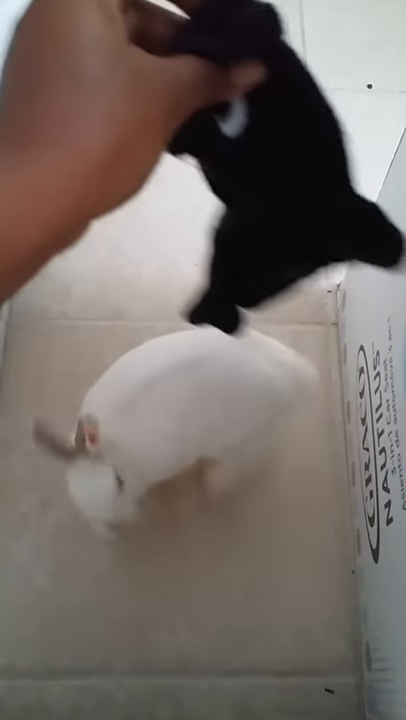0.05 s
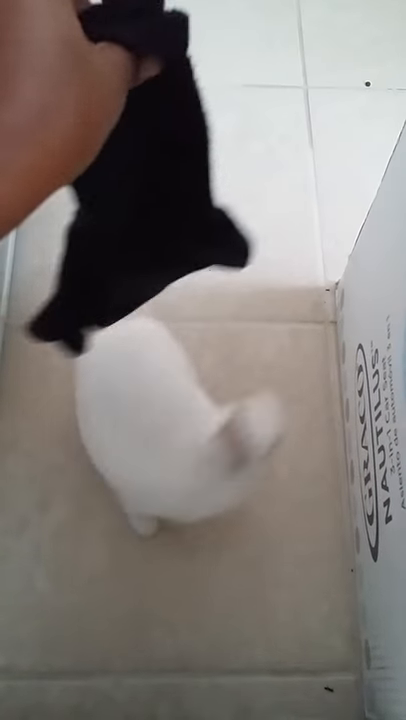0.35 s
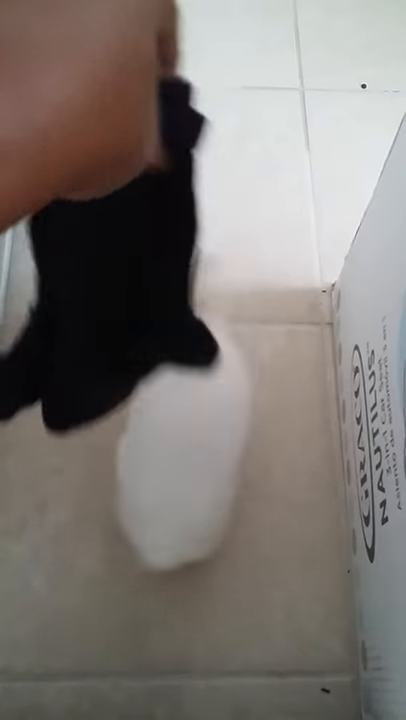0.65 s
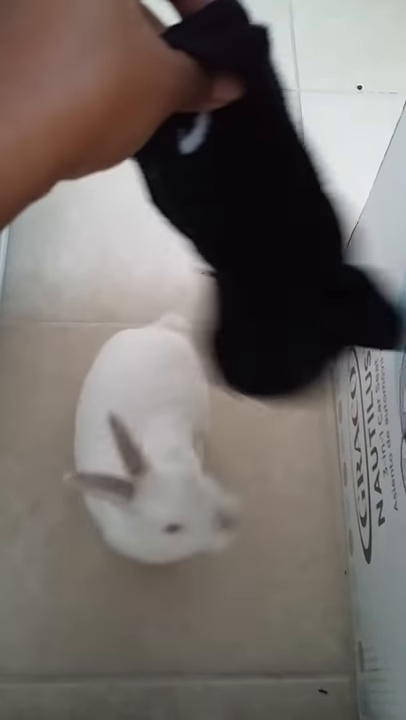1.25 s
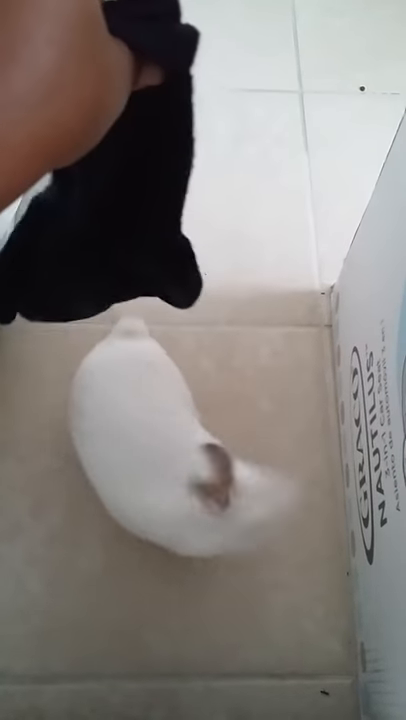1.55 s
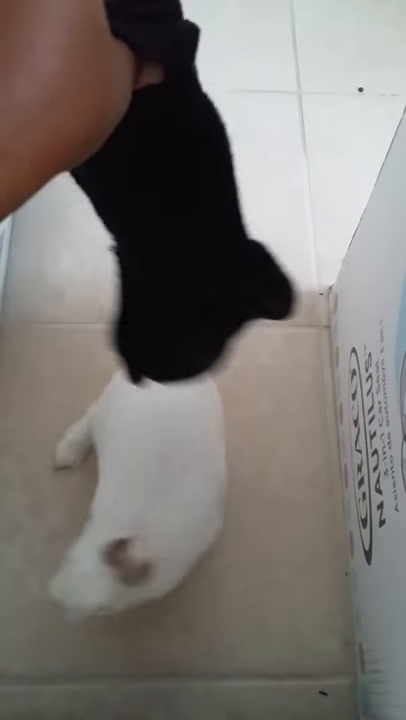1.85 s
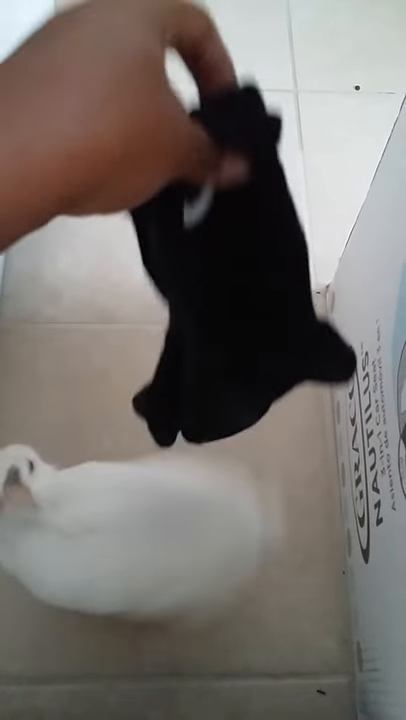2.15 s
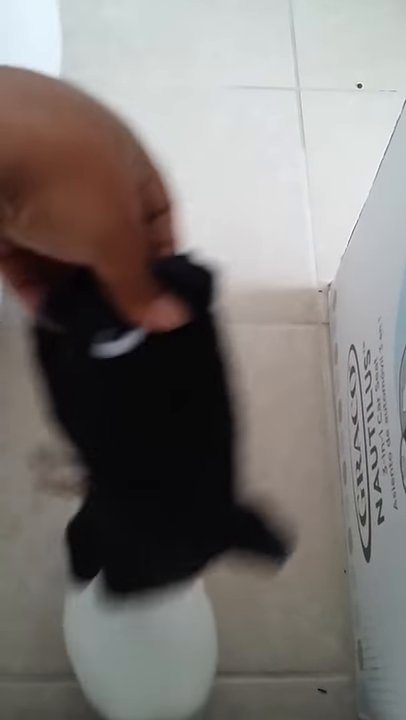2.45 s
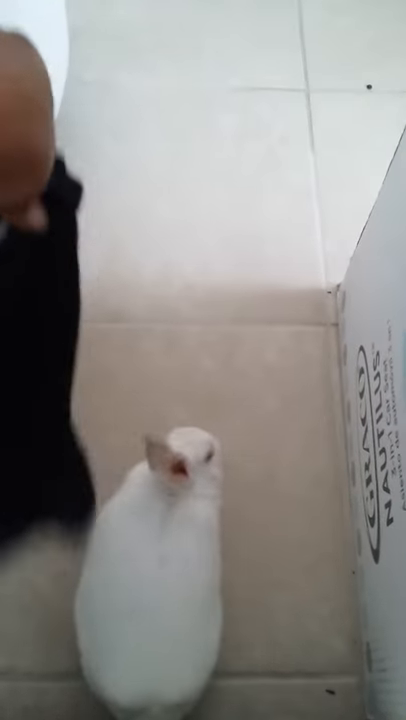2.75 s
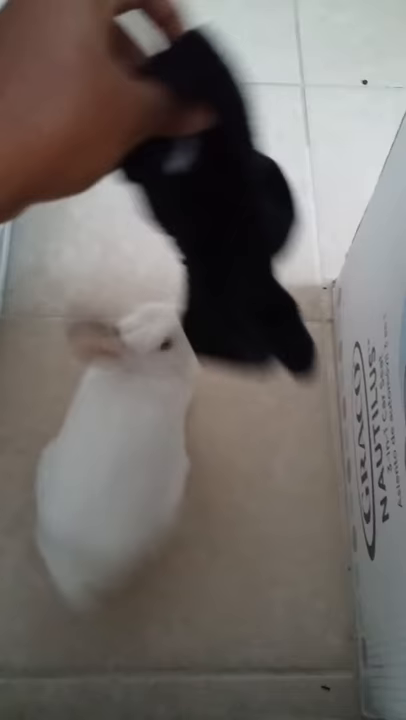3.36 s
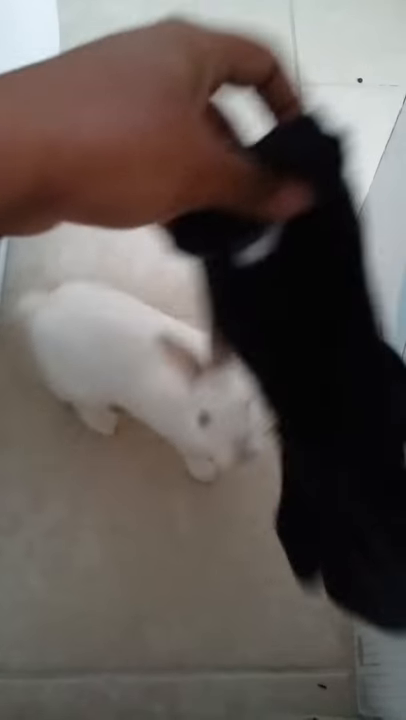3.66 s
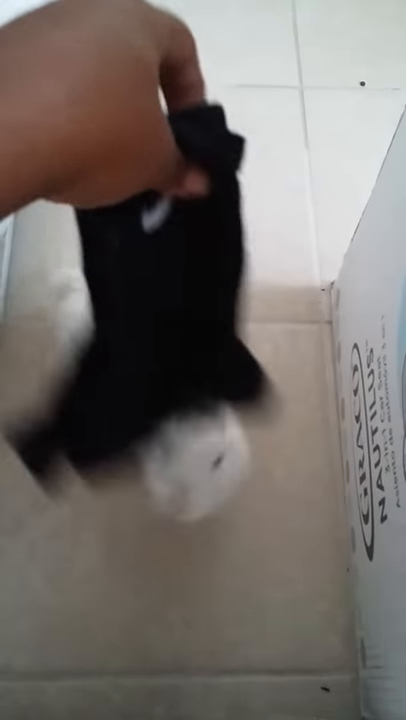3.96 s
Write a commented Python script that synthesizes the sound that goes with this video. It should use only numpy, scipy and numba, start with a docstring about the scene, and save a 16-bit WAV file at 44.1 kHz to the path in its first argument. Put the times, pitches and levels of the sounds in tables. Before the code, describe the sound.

Close to the microphone in a small, softly rumbling tiled room, a rabbit darts around with claw ticks, soft thuds and thin squeaks. Faint cloth swishes pass, and the scuffling grows busier and louder with brief raspy grunts.

```python
"""First the low rumble of a small tiled room, then the swish of a dangling cloth and the tick of claws.
A young rabbit, teased with the cloth, darts about beside a cardboard box, close to a stereo microphone.
Its paws knock, thud and scuff on the floor; the box throws the scuffs and swishes back.
Short nasal squeaks, a thin harmonic voice, break into rasping grunts when it lunges: flutter and
puffs of air ringing its throat and nose. The tiles add a short echo."""
import sys
import numpy as np
from scipy import signal
from scipy.fft import rfft, irfft
from scipy.io import wavfile
from scipy.ndimage import uniform_filter1d, map_coordinates
from numba import njit

SR = 44100
rng = np.random.default_rng(int(sys.argv[2]) if len(sys.argv) > 2 else 0)


def to_wav(s):
    """Save 16-bit WAV."""
    ch = np.atleast_2d(s).T  # columns
    pcm = np.round(np.clip(ch, -1, 1) * 32767)  # PCM
    wavfile.write(sys.argv[1], SR, pcm.astype(np.int16))


N = 176400

# spectrum of the room tone: f/Hz, relative level/dB
ROOM_COLOUR = [(20, -42), (30, -12), (45, -17.5), (61, -2), (78, -7.5), (100, -6.5), (130, 0.5),
               (160, -2.5), (195, -11.5), (260, -8), (400, -16.5), (600, -20.5), (1300, -35.5), (2400, -36),
               (3600, -43), (8000, -46), (14500, -54)]
# its balance between the microphones: f/Hz, left-right/dB
ROOM_TONE_BALANCE = [(60, -5.5), (220, -2), (700, -6), (1300, -1), (8000, 0.5)]
# its stereo width: f/Hz, side-mid/dB
ROOM_WIDTH = [(60, -32), (130, -17), (290, -15), (640, -3), (1300, 4), (3000, -1), (14000, 1)]
ROOM_DB, DRONE_DB, DRONE_HZ = -37.5, -41.5, 129.4

# swings of the cloth: t/s, length/s, level/dB
CLOTH_SWISHES = [(0.226, 0.25, -60.5), (0.945, 0.23, -60), (1.289, 0.078, -53.5), (1.509, 0.047, -50.5),
                 (1.673, 0.17, -57), (1.994, 0.13, -55), (2.128, 0.11, -55), (3.073, 0.22, -58.5),
                 (3.483, 0.18, -56.5)]
# spectrum of rubbing cloth: f/Hz, relative level/dB
SWISH_COLOUR = [(500, -5), (1500, -19), (3500, -4), (5500, -2.5), (8000, 4.5), (10000, 1), (14500, -13)]

# claws striking the tiles: t/s, level/dB, extra top treble/dB
CLAW_TICKS = [(0.242, -50, 12), (0.523, -54.5, 12), (0.67, -48.5, 12), (0.6778, -42.5, 3.5), (.790, -45, 1),
              (0.852, -43.5, 9), (0.9616, -46, 9), (1.1393, -38.5, 6.5), (1.473, -40, 0), (1.484, -46.5, 5),
              (1.746, -43.5, -8), (2.047, -37, -4), (2.075, -44, -7), (2.293, -48, 2), (2.3177, -45.5, 2),
              (2.576, -35, -11), (2.6832, -47.5, 4), (3.2516, -33.5, 2), (3.2805, -40, 6),
              (3.3034, -35.5, -3), (3.329, -36, 14), (3.3956, -35.5, 2), (3.458, -37.5, 8),
              (3.5708, -36, -3), (3.6636, -38, 1), (3.689, -38.5, 2), (3.698, -31.5, -1)]
# spectrum of a claw tick: f/Hz, relative level/dB
CLAW_COLOUR = [(300, -28), (1500, -3.5), (5000, 3.5), (8000, 13), (11000, 4.5), (14500, 3.5)]
TICK_DECAY_S, TICK_TAIL_S, TICK_TAIL_DB, TICK_RING_DB = 0.0035, 0.013, -12, 4.5
# balance of cloth, claws and scuffs between the microphones: f/Hz, left-right/dB
SCUFFLE_BALANCE = [(2200, -2), (4800, 11.5), (8000, 6.5), (13000, 0)]

# paws slapping the tiles: t/s, level/dB, left-right/dB
PAW_KNOCKS = [(0.532, -39.5, -13), (.886, -37.5, 6), (1.464, -38, 6), (1.48, -30, 5), (2.561, -36, 9)]
# resonances of a knock: f/Hz, nominal width/Hz, relative level/dB
KNOCK_RESONANCES = [(500, 176, 7), (880, 320, 3), (1510, 300, -10.5), (2670, 550, -9.5),
                    (5460, 3200, -14.5)]
KNOCK_ATTACK_S, KNOCK_DECAY_S = 0.0016, 0.0067

# clear squeaks: t/s, length/s, attack/s, start f/Hz, middle f/Hz, end f/Hz, level/dB,
# 2nd and 3rd harmonic at mid-squeak/dB, roughness/0-1, left-right/dB
RABBIT_SQUEAKS = [(0.564, 0.031, .008, 797, 829, 810, -47, -6.5, -17, 0.07, 8),
                  (0.881, 0.033, 0.0033, 804, 734, 760, -48.5, -10.5, -18, 0.47, 10),
                  (1.062, 0.035, .005, 773, 817, 825, -45.5, -18, -13, 0.39, 8),
                  (1.552, 0.032, .003, 860, 894, 800, -37, -13.5, -27, 0.04, 4),
                  (1.723, 0.044, 0.0086, 810, 811, 764, -44.5, -6.5, -16, 0.1, 1),
                  (1.757, 0.045, .006, 810, 850, 815, -45, -8, -3.5, 0.04, 2),
                  (2.013, 0.05, .008, 896, 844, 840, -48.5, -8, -8, 0.29, 1),
                  (2.640, 0.06, 0.03, 917, 913, 924, -36, -13, -13.5, 0.09, 4),
                  (2.912, 0.034, 0.0063, 843, 820, 774, -39, -21, -26, .1, 0),
                  (3.319, 0.036, 0.0068, 797, 839, 860, -38, -2.5, -12, 0, 6),
                  (3.352, 0.057, 0.0077, 1009, 999, 800, -41.5, -9, -19, 0.58, 10.5),
                  (3.442, 0.056, 0.0073, 907, 929, 860, -42, -26, -7.5, 0.87, 13),
                  (3.632, 0.021, 0.0034, 840, 834, 790, -35.5, -7.5, -27, 0.42, 9),
                  (3.644, 0.047, .004, 774, 810, 840, -38.5, -8.5, -21, 0.4, 7.5),
                  (3.725, 0.019, 0.0056, 820, 854, 850, -39, -5, -18, 0.3, 9)]
SQUEAK_RELEASE_S, OVERTONE_FADE_DB, UPPER_DB, UPPER_STEP_DB = .012, 9, -37, 1.2
WOBBLE, SHIMMER_DB, CYCLE_JITTER_RAD, OVERTONE_RASP = 0.1, 2, .07, .25
# nasal colour of squeaks and grunts: f/Hz, gain/dB
NASAL_COLOUR = [(2600, 0.5), (3700, -1.5), (4800, 8.5), (5500, 2), (6200, 4), (7100, -2), (8500, -2.5),
                (10000, -3)]

# feet landing: t/s, level/dB, f/Hz
FOOT_THUDS = [(0.799, -22.5, 133), (1.499, -34, 126), (1.764, -30, 140), (1.986, -30, 141.6),
              (3.695, -34, 133), (3.952, -25.5, 126)]
THUD_ATTACK_S, THUD_DECAY_S = 0.0055, 0.033

# paws sliding on the tiles: t/s, length/s, attack/s, release/s, level/dB, extra top treble/dB
PAW_SCUFFS = [(1.14, 0.067, .008, 0.026, -61, 12), (2.578, 0.055, 0.021, 0.032, -38, 3.5),
              (3.307, 0.068, 0.03, 0.029, -35.5, 6.5), (3.415, 0.093, 0.033, 0.028, -42.5, 0.5),
              (3.580, 0.031, 0.015, 0.015, -38.5, -5), (3.610, 0.022, 0.0033, 0.033, -33.5, 4)]
# spectrum of a sliding paw: f/Hz, relative level/dB
PAW_COLOUR = [(500, 5), (2500, -11), (3600, -6.5), (4600, -0.5), (6200, -1.5), (7700, 3), (9500, -2),
              (11500, -11.5), (14500, -14)]

# rasping grunts: t/s, length/s, attack/s, release/s, level/dB, resonance factor at start and at end,
# low resonances/dB, high resonances/dB, left-right/dB
RABBIT_GRUNTS = [(1.735, 0.021, .007, .008, -42.5, 0.91, 0.82, 9, -2, 8),
                 (2.038, 0.051, 0.007, 0.007, -42.5, 1.19, 1.09, 10, 4.5, 1),
                 (2.57, 0.069, 0.058, 0.019, -33, 0.87, 1.03, 4, 0.5, 1.5),
                 (3.084, 0.086, 0.019, 0.039, -48, 1.04, 1.13, 6, -5, -6),
                 (3.301, 0.038, 0.015, .005, -39, 0.95, 1.1, -2.5, 2.5, -1),
                 (3.34, 0.05, 0.01, 0.039, -32, 1.03, 0.97, -0.5, 2.5, 1),
                 (3.423, 0.074, 0.016, 0.011, -35, 0.936, 1.145, -3, -3.5, 0),
                 (3.611, 0.036, 0.0018, 0.01, -36, 0.78, 1.04, -4.5, -1.5, 3),
                 (3.670, 0.066, 0.023, 0.009, -35.5, 0.895, 0.82, 1.5, -3, 2.5)]
# resonances of throat and nose at rest: f/Hz, width/Hz, relative level/dB
THROAT_RESONANCES = [(274, 151, 5), (454, 62, -2), (966, 275, -2), (1190, 210, 3.5), (1585, 130, -2.5),
                     (2147, 440, 0.5), (2583, 284, -4.5)]
FLUTTER_HZ, FLUTTER_JITTER, THROAT_WANDER, RAGGED_DB = 289.5, .2, 0.048, 1.2
RASP_AIR_DB, HISS_DB, HISS_HZ = -6, -22, 5000


def undb(db):
    """Decibels to gain."""
    return 10 ** (np.asarray(db) / 20)


def unit(x):
    """Scale to rms 1."""
    return x / np.sqrt(np.mean(x ** 2) + 1e-20)


def noise():
    """White noise."""
    return rng.standard_normal(N)


def walk(rate):
    """Smooth random wander of rms 1, quicker at a higher rate."""
    window = max(2, int(SR / rate))
    return unit(uniform_filter1d(uniform_filter1d(noise(), window), window))


def span(start, length):
    """Sample indices of an event, and the time since its start."""
    i = np.arange(int(start * SR), min(N, int((start + length) * SR)))
    return i, np.arange(len(i)) / SR


def gate(t, length, attack, release):
    """Envelope with a quarter-sine rise and fall."""
    rise = np.sin(np.pi / 2 * np.clip(t / attack, 0, 1))
    fall = np.sin(np.pi / 2 * np.clip((length - t) / release, 0, 1))
    return rise * fall


def contour(points):
    """Gain at every frequency from points of f/Hz, level/dB."""
    hz, db = np.array(points, float).T
    bin_hz = np.arange(N // 2 + 1) * SR / N
    return undb(np.interp(np.log(bin_hz + 1e-3), np.log(hz), db))


def colour(x, points):
    """Filter by points of f/Hz, level/dB."""
    return irfft(rfft(x) * contour(points), N)


def split_treble(x, crossover_hz=8860):
    """The body of a sound and its top treble."""
    bin_hz = np.arange(N // 2 + 1) * SR / N
    low = irfft(rfft(x) / (1 + (bin_hz / crossover_hz) ** 8), N)
    return low, x - low


def resonate(x, hz, nominal_width):
    """A band-pass resonance applied twice, for steep skirts."""
    b, a = signal.iirpeak(hz, hz / nominal_width / .65, fs=SR)
    return signal.lfilter(b, a, signal.lfilter(b, a, x))


@njit
def sweep(x, hz, width_hz):
    """A state-variable band-pass whose centre moves."""
    y, band_state, low_state = np.empty(len(x)), 0., 0.
    for i in range(len(x)):
        g, damping = np.tan(np.pi * hz[i] / SR), width_hz / hz[i]
        band = (band_state + g * (x[i] - low_state)) / (1 + g * (g + damping))
        band_state = 2 * band - band_state
        low_state += 2 * g * band
        y[i] = damping * band
    return y


def pan(x, db):
    """Place a sound by its level difference between the left and right microphone."""
    return x * undb(np.array([[db], [-db]]) / 2)


def lean(x, points):
    """Left-right balance that changes with frequency."""
    gain = np.sqrt(contour(points))
    return irfft(rfft(x) * np.array([gain, 1 / gain]), N)


def scattered(points, grain=1, side_db=-2):
    """Coloured noise that reaches the two microphones by different paths."""
    mid, side = (unit(colour(noise() * grain, points)) for _ in range(2))
    return unit(mid + undb(side_db) * side * np.array([[1], [-1]]))


def rub(strokes, points, graininess):
    """Strokes of friction noise with a fine and a coarse grain."""
    out = np.zeros((2, N))
    grain = undb(graininess * (walk(1500) + 1.4 * walk(120)))
    low, high = split_treble(scattered(points, grain))
    for start, length, attack, release, db, treble_db in strokes:
        i, t = span(start, length)
        friction = low[:, i] + undb(treble_db) * high[:, i]
        out[:, i] += undb(db) * gate(t, length, attack, release) * friction
    return out


def room_tone():
    """The room all round: low rumble and a wavering drone, stronger on the right, and diffuse hiss."""
    mid = undb(ROOM_DB) * unit(colour(noise(), ROOM_COLOUR))
    side = colour(undb(ROOM_DB) * unit(colour(noise(), ROOM_COLOUR)), ROOM_WIDTH)
    mid += undb(DRONE_DB) * unit(resonate(noise(), DRONE_HZ, nominal_width=58))
    return lean(np.array([mid + side, mid - side]), ROOM_TONE_BALANCE)


def cloth():
    """The dangling cloth rubs, swelling and fading with each swing."""
    strokes = [(start, length, length / 2, length / 2, db, 0) for start, length, db in CLOTH_SWISHES]
    return rub(strokes, SWISH_COLOUR, graininess=3)


def box_reflection(x, lags_s=(.0031, .0042), db=-5):
    """The cardboard side nearby throws the sound back, to the left microphone first."""
    i = np.arange(N)
    reflected = np.array([map_coordinates(channel, [i - lag * SR]) for channel, lag in zip(x, lags_s)])
    return (x + undb(db) * reflected) / np.hypot(1, undb(db))


def tile_echo(x, echo_db, t60_s=0.27):
    """A short tail from the tiles, arriving 6 ms late and different at each microphone."""
    t = np.arange(SR // 2) / SR
    tail = rng.standard_normal((2, len(t))) * undb(-60 * t / t60_s) * (t > .006)
    tail = undb(echo_db) * tail / np.linalg.norm(tail, axis=1, keepdims=True)
    return x + signal.fftconvolve(x, tail, axes=1)[:, :N]


def claws():
    """Claws tick on the tiles, each with a ring of its own and a faint scratch behind it."""
    out = np.zeros((2, N))
    low, high = split_treble(scattered(CLAW_COLOUR))
    ring_hz = rng.uniform(4500, 11000, len(CLAW_TICKS))
    for (start, db, treble_db), hz in zip(CLAW_TICKS, ring_hz):
        i, t = span(start, .1)
        envelope = np.exp(-t / TICK_DECAY_S) + undb(TICK_TAIL_DB) * np.exp(-t / TICK_TAIL_S)
        tick = envelope * (low[:, i] + undb(treble_db) * high[:, i])
        ring = undb(TICK_RING_DB) * resonate(tick, hz, nominal_width=1100)
        out[:, i] += undb(db) * np.std(tick) * unit(tick + ring)  # the ring adds colour, not level
    return out


def knocks():
    """A paw slaps the tiles with a short, dull knock."""
    out = np.zeros((2, N))
    body = sum(undb(db) * resonate(noise(), hz, 2 * width) for hz, width, db in KNOCK_RESONANCES)
    for start, db, pan_db in PAW_KNOCKS:
        i, t = span(start, 0.025)
        envelope = np.minimum(t / KNOCK_ATTACK_S, 1) * np.exp(-t / KNOCK_DECAY_S)
        out[:, i] += pan(undb(db) * unit(body[i]) * envelope, pan_db)
    return out


def squeaks():
    """A thin harmonic voice on a short pitch curve, dulling as it goes; strain makes it unsteady."""
    out = np.zeros((2, N))
    wobble, shimmer, jitter, rasp = walk(310), walk(280), walk(1400), walk(1400)
    upper_db = [UPPER_DB + UPPER_STEP_DB * k for k in range(8)]  # harmonics 4 to 11
    for start, length, attack, hz0, hz1, hz2, db, second_db, third_db, rough, pan_db in RABBIT_SQUEAKS:
        i, t = span(start, length)
        pitch_curve = np.polyfit([0, .5, 1], [hz0, hz1, hz2], 2)
        hz = np.polyval(pitch_curve, t / length) * (1 + WOBBLE * rough * wobble[i])
        phase = 2 * np.pi * np.cumsum(hz) / SR + CYCLE_JITTER_RAD * jitter[i]
        gains = undb([second_db, third_db] + upper_db)
        overtones = sum(gain * np.sin(k * phase) for k, gain in enumerate(gains, 2))
        overtones *= 1 + OVERTONE_RASP * rasp[i]
        dulling = undb(OVERTONE_FADE_DB * (.5 - t / length))
        tone = np.sqrt(2) * (np.sin(phase) + dulling * overtones)
        envelope = undb(db + SHIMMER_DB * rough * shimmer[i]) * gate(t, length, attack, SQUEAK_RELEASE_S)
        out[:, i] += pan(tone * envelope, pan_db)
    return out


def thuds():
    """Soft feet land a little to the right with a short low boom."""
    out = np.zeros(N)
    for start, db, hz in FOOT_THUDS:
        i, t = span(start, .15)
        envelope = np.minimum(t / THUD_ATTACK_S, 1) * np.exp(-t / THUD_DECAY_S)
        out[i] += undb(db) * np.sin(2 * np.pi * hz * t) * envelope
    return pan(out, db=-3.5)


def scuffs():
    """Paws slide on the tiles in brief strokes of friction."""
    return rub(PAW_SCUFFS, PAW_COLOUR, graininess=-1)


def grunts():
    """Irregular flutter and ragged puffs of air ring the throat resonances, which glide and wander."""
    out = np.zeros((2, N))
    jitter, air, ragged = walk(300), noise(), undb(RAGGED_DB * walk(250))
    hiss = unit(resonate(noise(), HISS_HZ, HISS_HZ / 10))
    wander = [np.exp(THROAT_WANDER * walk(56)) for _ in THROAT_RESONANCES]
    for start, length, attack, release, db, glide0, glide1, low_db, high_db, pan_db in RABBIT_GRUNTS:
        i, t = span(start, length)
        cycle = np.cumsum(FLUTTER_HZ * np.exp(FLUTTER_JITTER * jitter[i])) / SR % 1
        pulses = unit(1. * (np.diff(cycle, prepend=1) < 0))  # one as each cycle begins
        puff = unit(np.exp(-cycle / .5))
        drive = (pulses + undb(RASP_AIR_DB) * puff * air[i]) * ragged[i]
        glide = glide0 + (glide1 - glide0) * t / length
        rasp = 0
        for (hz, width, resonance_db), drift in zip(THROAT_RESONANCES, wander):
            gain = undb(resonance_db + low_db * (hz < 700) + high_db * (hz > 1450))
            centre = hz * glide * drift[i]
            pass_width = 1.45 * width  # two passes narrow the band
            rasp += gain * sweep(sweep(drive, centre, pass_width), centre, pass_width)
        grunt = unit(rasp) + undb(HISS_DB) * puff * hiss[i]
        out[:, i] += pan(grunt * undb(db) * gate(t, length, attack, release), pan_db)
    return out


def nasal_voice(calls, right_lag_s=0.00011):
    """The rabbit's calls share a nasal colour and reach the left microphone first."""
    left, right = colour(calls, NASAL_COLOUR)
    return np.array([left, map_coordinates(right, [np.arange(N) - right_lag_s * SR])])


def scene():
    """Cloth, feet and voice close by, over the tone of the small room."""
    rubbing = box_reflection(scuffs() + cloth())
    scuffle = lean(claws() + rubbing, SCUFFLE_BALANCE)
    voice = nasal_voice(squeaks() + grunts())
    echoing = tile_echo(voice + knocks(), echo_db=-11) + tile_echo(scuffle, echo_db=-8)
    return echoing + thuds() + room_tone()


def record(dry):
    """The recorder cuts the top steeply above 14550 Hz."""
    return signal.sosfilt(signal.ellip(8, .2, 70, 14550, fs=SR, output="sos"), dry)


dry = scene()
out = record(dry)
to_wav(out)
```